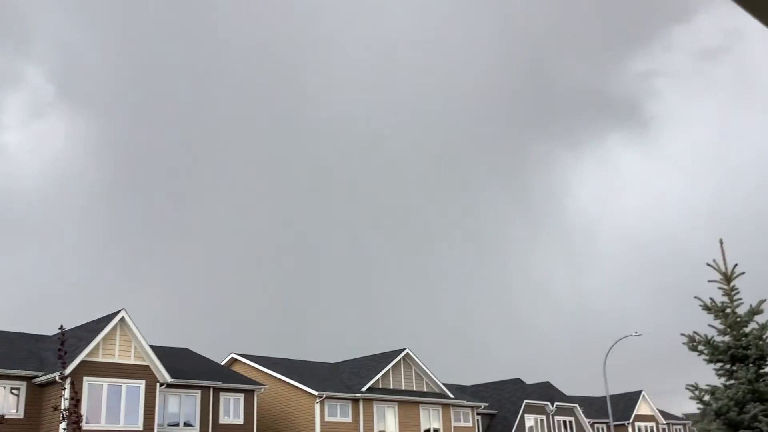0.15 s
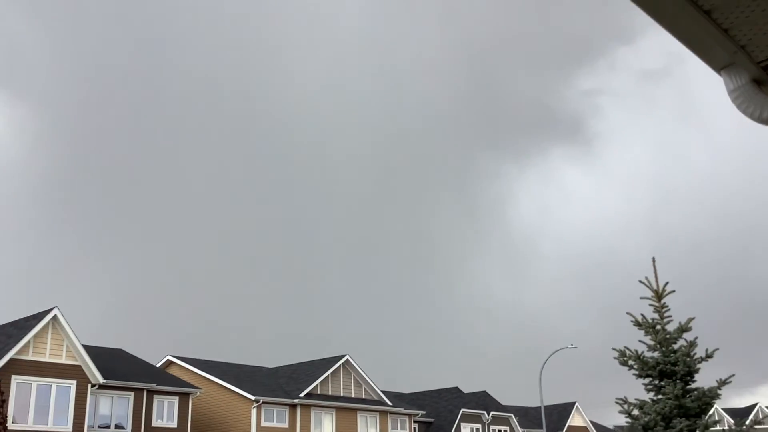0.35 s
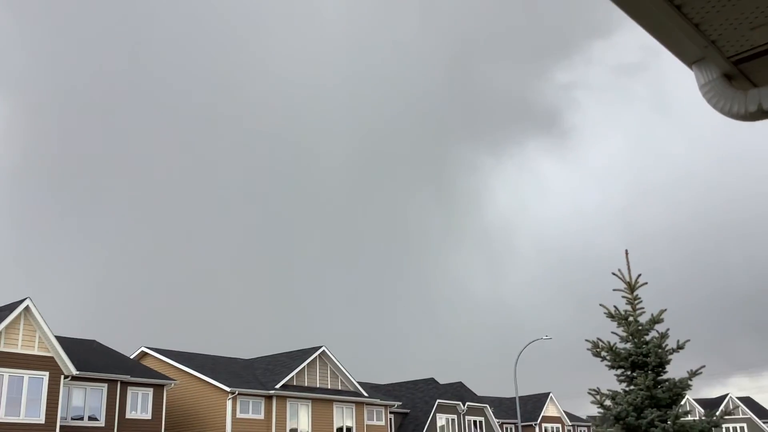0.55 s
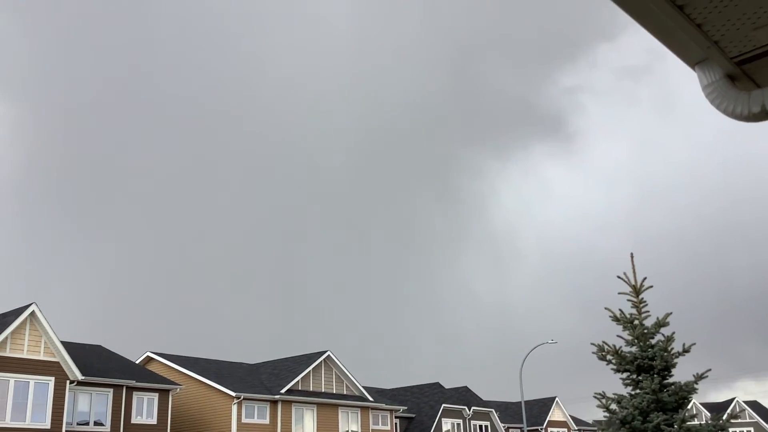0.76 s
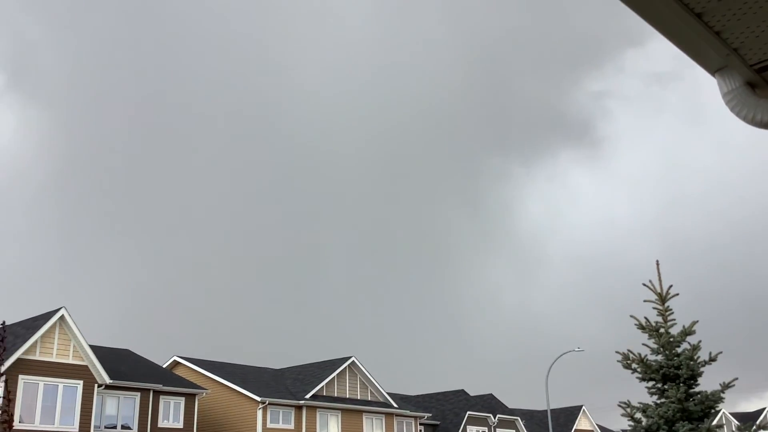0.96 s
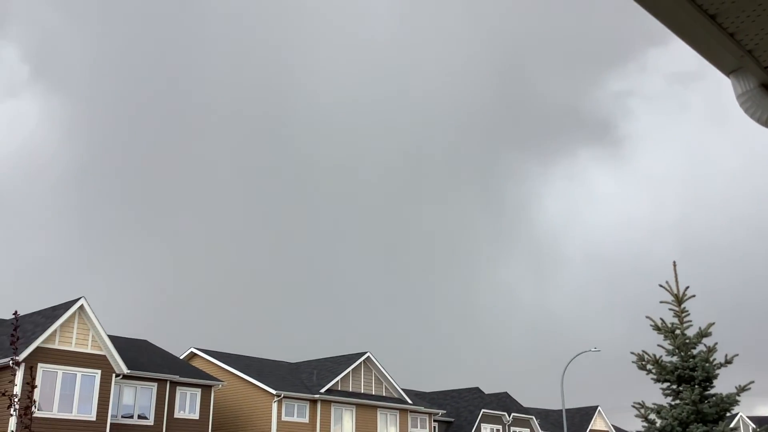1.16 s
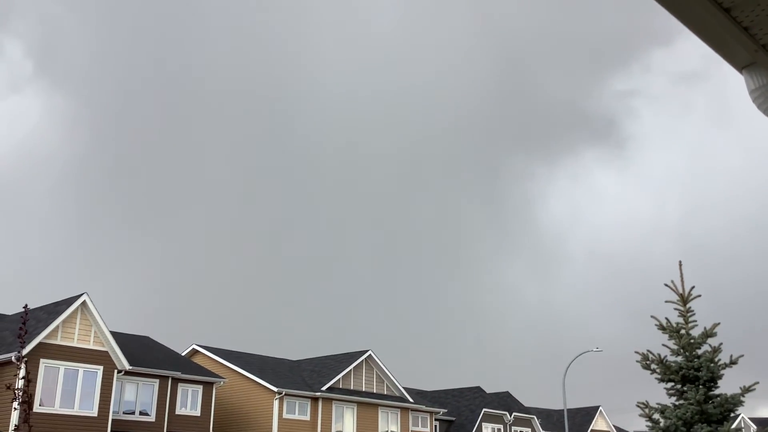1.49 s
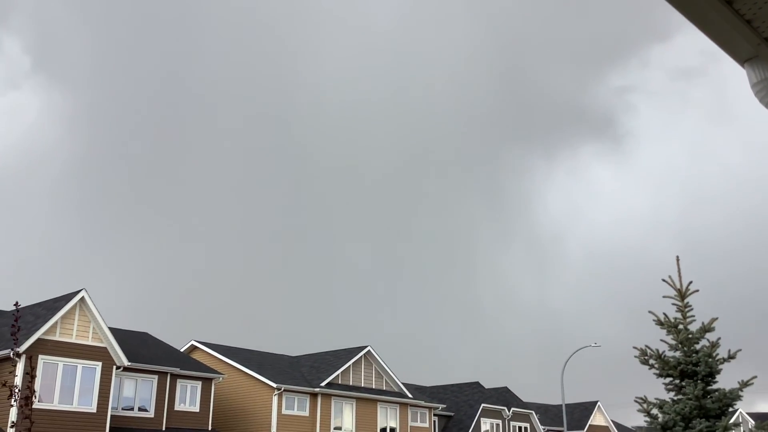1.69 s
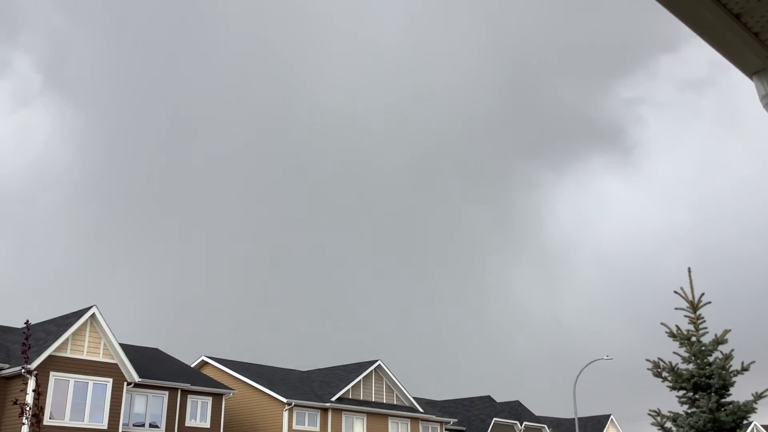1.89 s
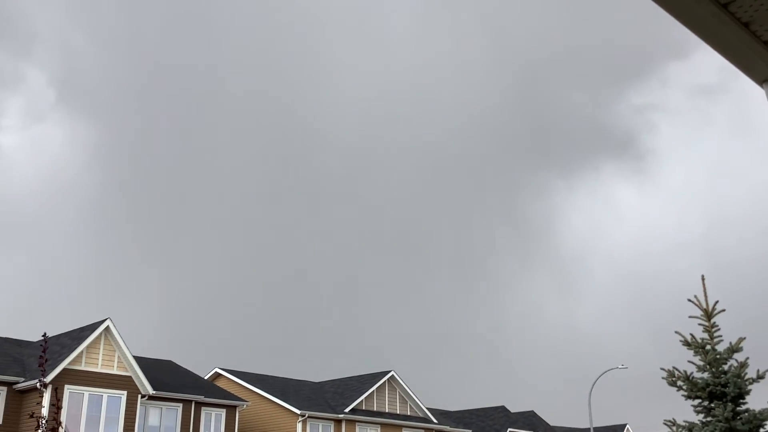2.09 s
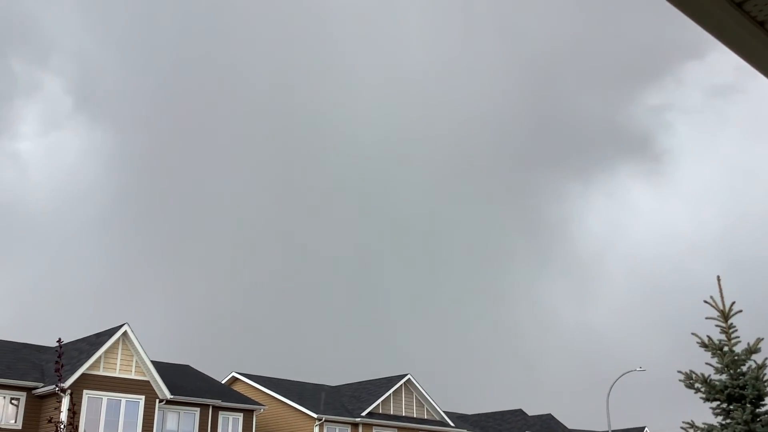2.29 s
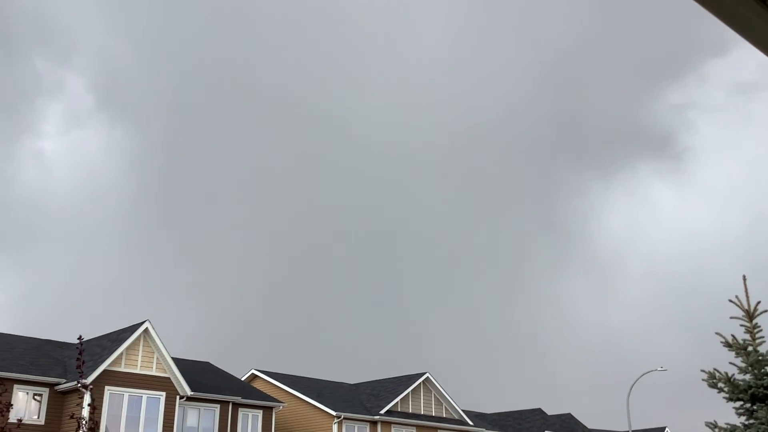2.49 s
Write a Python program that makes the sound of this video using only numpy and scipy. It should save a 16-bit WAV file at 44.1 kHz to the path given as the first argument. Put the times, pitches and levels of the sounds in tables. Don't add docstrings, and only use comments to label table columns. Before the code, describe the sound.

Thunder: a short low grumble over light hissing rain, then at about 0.2 seconds a violent tearing crack with dense, deep booms, squashed at the microphone until about 0.6. It sinks to a rumble, then surges again near 1.0, 1.4 to 1.5 and 1.9 to 2.1 seconds, each duller, with weaker rolls until about 2.6. Small raindrops tick and splash close by outdoors.

```python
import sys
import numpy as np
from scipy import signal
from scipy.io import wavfile
from scipy.ndimage import uniform_filter1d

SR = 44100
rng = np.random.default_rng(int(sys.argv[2]) if len(sys.argv) > 2 else 0)


def dump_mix(stems):
    frames = np.atleast_2d(stems).T
    limited = np.clip(frames, -1, 1)
    pcm = np.round(limited * 32767).astype(np.int16)
    wavfile.write(sys.argv[1], SR, pcm)


def gain_from_decibels(decibels):
    exponent = np.asarray(decibels, float) / 20
    return 10 ** exponent


N = 116865


def evened(x):
    return x / np.sqrt(np.mean(x ** 2) + 1e-20)


def add(mix, s, sound):
    part = mix[round(s * SR):][:len(sound)]
    part += sound[:len(part)]


def colour(x, tone):
    f, level_db = np.transpose(tone)
    hz = abs(np.fft.fftfreq(8192, 1 / SR))
    spectrum_db = np.interp(np.log(hz + 1), np.log(f + 1), level_db)
    log_gain = np.maximum(spectrum_db, -100) * np.log(10) / 20
    taps = np.fft.ifft(np.exp(np.conj(signal.hilbert(log_gain)))).real[:4096]
    return evened(signal.oaconvolve(x, taps)[:len(x)])


def swarm(per_s, spread_db):
    hit, size, sign = rng.random((N, 3)).T
    height = gain_from_decibels(-spread_db * np.log(size + 0.0012))
    return (hit < per_s / SR) * height * np.sign(sign - 0.5)


def band(x, lo_hz, hi_hz):
    sos = signal.butter(2, [lo_hz, hi_hz], "band", fs=SR, output="sos")
    return evened(signal.sosfilt(sos, x))


def patched(x, patch_db):
    z = signal.stft(x, SR, nperseg=1024, noverlap=768)[2]
    field = uniform_filter1d(rng.standard_normal(z.shape), size=10, axis=0)
    field = evened(uniform_filter1d(field, size=8, axis=1))
    y = signal.istft(z * gain_from_decibels(patch_db * field), SR, nperseg=1024, noverlap=768)[1]
    return evened(y[:N])


# (f/Hz, level/dB per Hz)
RAIN_TONE = [(2000, -20), (3600, -9.5), (5700, 0.5), (7500, -10.5), (9800, -3.5), (11700, -14),
             (14600, -10), (15900, -30.5)]
PATTER_HZ = [4730, 5600, 7400, 9800, 12000, 14300]
RAIN_DB, RAIN_PATCH_DB = -60.5, 5.5
PATTER_PER_S, PATTER_DB, PATTER_SPREAD_DB, PATTER_T60 = 1300, -66, 3, 0.12


def rain():
    hiss = patched(colour(rng.standard_normal(N), RAIN_TONE), RAIN_PATCH_DB)
    t, patter = np.arange(2000) / SR, np.zeros(N)
    for hz in PATTER_HZ:
        tick = rng.standard_normal(2000) * gain_from_decibels(-60 * t / PATTER_T60)
        hits = swarm(PATTER_PER_S / len(PATTER_HZ), PATTER_SPREAD_DB)
        ticks = signal.oaconvolve(hits, tick)[:N]
        patter += band(ticks, hz * 0.81, hz * 1.2) * (PATTER_HZ[0] / hz) ** 0.75
    return gain_from_decibels(RAIN_DB) * hiss + gain_from_decibels(PATTER_DB) * evened(patter)


# (t/s, peak level/dB, low part above high part/dB, t60/s)
DROPS = [(0.02, -44, 0, 0.044), (0.105, -40, 1, 0.085), (0.2114, -48, 3.5, 2.1), (0.2813, -37.5, -9, 0.081),
         (.327, -50, -11, .1), (0.3481, -47, 8, 0.04), (.474, -53, 4, .05), (.507, -48, 2, .06),
         (.527, -42, 1, .12), (0.381, -35.5, -3, 0.072), (0.4105, -44, -11, 0.39), (0.554, -49.5, -3, 0.06),
         (0.5801, -51, -10, 0.085), (0.7763, -51, 0, 0.13), (1.0201, -46, -2, 0.033),
         (1.067, -56, -3, 0.055), (1.2947, -37.5, -5.5, 0.14), (1.6174, -50, 3.5, 0.62),
         (1.6984, -46.5, 2, 0.17), (1.933, -41.5, -2, 0.23), (1.9595, -52, 9, 0.067),
         (2.1754, -42.5, -0.5, 0.3), (2.2358, -53, -8, 0.036), (2.4146, -43, 1, 0.059)]
DROP_TRIM_DB, SPLASH_DB = -4, -1.5
DROP_RISE_S, DROP_T60_MAX = 0.006, 0.13


def drops():
    noise, t, out = rng.standard_normal(N + SR), np.arange(SR // 8) / SR, np.zeros(N)
    high = band(band(noise, 7000, 15500), 7000, 15500)
    low = band(noise, 3800, 7500)
    for s, db, low_db, t60 in DROPS:
        start = round(s * SR)
        at = slice(start, start + len(t))
        decay = gain_from_decibels(SPLASH_DB - 60 * t / min(t60, DROP_T60_MAX))
        shape = gain_from_decibels(db + DROP_TRIM_DB) * np.minimum(t / DROP_RISE_S, 1) * decay
        add(out, s, shape * (high[at] + gain_from_decibels(low_db) * low[at]))
    return out


# (t/s, level/dB, deep part above it/dB)
ROLL = [(0, -33, -7), (.07, -52, 5), (0.224, -39.5, 0), (0.234, -17, 1.5), (.45, -14, 11), (.62, -20, 1.5),
        (.76, -27, 4.5), (.99, -26, 1.5), (1.05, -24, 0), (1.29, -32.5, 2.5), (1.329, -26, -2.5),
        (1.55, -28, 4), (1.9, -33, 8), (1.95, -28, 8), (2.4, -29.5, 0.5), (2.47, -35, 8), (2.56, -31, -0.5),
        (2.65, -26, -7)]
# (f/Hz, level/dB per Hz)
ROLL_TONE = [(250, -21), (480, 0.5), (800, -0.5), (1500, -5), (2200, -12.5), (3400, -34), (6000, -54.5),
             (12000, -89)]
# (f/Hz, level/dB per Hz)
DEEP_TONE = [(25, -12.5), (60, -9.5), (100, 1.5), (180, -2.5), (320, -3), (500, -10), (900, -20),
             (3000, -94.5)]
ROLL_SPREAD_DB, ROLL_PATCH_DB = 2, 1.5
DEEP_STEADY = 0.25


def roll():
    s, db, deep_db = np.transpose(ROLL)
    t = np.arange(N) / SR
    upper = patched(colour(swarm(8000, ROLL_SPREAD_DB), ROLL_TONE), ROLL_PATCH_DB)
    deep = patched(colour(swarm(3000, ROLL_SPREAD_DB), DEEP_TONE), patch_db=2.0)
    power = uniform_filter1d(deep ** 2, size=1500)
    deep = evened(deep / (power + 0.05) ** (DEEP_STEADY / 2))
    return gain_from_decibels(np.interp(t, s, db)) * (upper + gain_from_decibels(np.interp(t, s, deep_db)) * deep)


# (t/s, peak level/dB, t60/s)
SIZZLE = [(0.0654, -36, 0.63), (0.225, -20.5, 0.24), (0.2898, -23.5, 0.33), (0.3294, -38, 0.49),
          (0.3481, -39, 0.15), (0.373, -18, 0.35), (0.4094, -28.5, 0.3), (0.4394, -20, 0.27),
          (0.4973, -26, 0.22), (0.5294, -40.5, 0.33), (0.58, -39, 0.41), (.66, -46.5, 0.92),
          (1.0036, -19.5, 0.13), (1.025, -45, 0.074), (1.08, -49, 0.4), (1.3965, -41, 0.23),
          (1.436, -41.5, 0.2), (2.0428, -45, 0.15), (2.366, -39.5, 0.23), (2.593, -41, 0.082)]
# (f/Hz, level/dB per Hz)
SIZZLE_TONE = [(2500, 4.5), (3500, 3.5), (5500, 0), (7000, -11), (10000, -19.5), (12000, -35)]
SIZZLE_TRIM_DB, SIZZLE_RISE_S = -8, 0.0039


def sizzle():
    t, shape = np.arange(SR // 3) / SR, np.zeros(N)
    for s, db, t60 in SIZZLE:
        rise = np.minimum(t / SIZZLE_RISE_S, 1)
        add(shape, s, rise * gain_from_decibels(db + SIZZLE_TRIM_DB - 60 * t / t60))
    return shape * patched(colour(swarm(14000, 2.0), SIZZLE_TONE), patch_db=1.2)


BOOM_WIDTH, BOOM_TRIM_DB = 0.28, -5
LEAD_IN = 2000


def boom(shocks, s, db, hz, t60, rise_s):
    piece = np.roll(shocks, LEAD_IN - round(s * SR))[:SR // 4 + LEAD_IN]
    lo_hz, hi_hz = hz / (1 + BOOM_WIDTH), hz * (1 + BOOM_WIDTH)
    low = band(band(piece, lo_hz, hi_hz), lo_hz / 2, hi_hz * 2)
    power = uniform_filter1d(low ** 2, size=round(2 * SR / hz))
    low = (low / np.sqrt(power + 0.025))[LEAD_IN:]
    t = np.arange(len(low)) / SR
    opening = np.sin(np.pi / 2 * np.minimum(t / (rise_s + 0.5 / hz), 1)) ** 2
    return low * opening * gain_from_decibels(db + BOOM_TRIM_DB - 60 * t / t60)


# (t/s, boom peak level/dB, boom pitch f/Hz, crackle above boom/dB)
CLAPS = [(.005, -26.5, 167, 4), (0.098, -23.5, 157, 1.5), (0.149, -24.5, 256, 0.5), (.159, -29, 400, 3),
         (0.171, -26.5, 568, 8.5), (0.228, 8.5, 285, -4.5), (0.251, -26, 290, -10), (0.275, -0.5, 350, -11),
         (0.29, 1.5, 252, -8), (0.307, 4, 430, -29), (0.336, 4.5, 126, -11), (0.344, 5, 92, -21.5),
         (0.38, 3, 299, -4.5), (0.41, -3.5, 403, -5.5), (.425, 5.5, 225, -12), (.448, -1, 242, -10.5),
         (0.471, 3, 254, -8.5), (0.497, 9, 191, -15.5), (0.552, 0, 306, -13.5), (0.58, 0, 194, -17.5),
         (0.595, 0, 294, -17), (1.002, -4.5, 132, -8.5), (0.05, -32.5, 500, -2.5), (0.629, -10.5, 110, -10),
         (0.719, -24, 180, 2.5), (1.316, -35, 500, -4), (1.4, -12.5, 490, -5.5), (1.473, -18.5, 500, 1),
         (1.638, -22.5, 470, -8.5), (1.737, -27, 600, -4), (1.936, -28, 300, -7.5),
         (2.078, -15, 466, -17.5), (2.187, -35.5, 700, -25), (2.348, -18, 400, -8.5),
         (2.542, -20, 700, -18.5)]
# (t/s, peak level/dB)
SNAPS = [(0.047, -39), (0.1, -40.5), (0.238, -15.5), (0.294, -21.5), (0.348, -3.5), (0.388, -18),
         (0.415, -7), (.452, -18.5), (0.502, -27), (0.555, -22.5), (1.005, -29.5), (1.015, -13.5),
         (1.734, -32.5), (1.935, -24.5), (2.184, -27.5)]
# (t/s, peak level/dB, pitch f/Hz, t60/s)
BOOMS = [(0.022, -7, 145, 0.05), (0.046, -13.5, 327, 0.063), (0.072, -10.5, 270, 0.067),
         (0.199, -8, 210, 0.041), (0.248, 3.5, 80, 0.21), (0.303, -11, 487, 0.097), (0.556, -2, 106, 0.5),
         (0.678, -7, 320, 0.092), (0.698, -15, 101, 0.23), (0.784, -13, 110, 0.24), (0.838, -11, 105, 0.14),
         (0.926, -11, 96, 0.14), (1.04, -23, 139, 0.049), (1.195, -17, 125, 0.25), (2.13, -25, 303, 0.2),
         (2.168, -17, 208, 0.17), (0.943, -2.5, 300, 0.054), (1.001, 4, 350, 0.13), (1.006, -13, 577, 0.14),
         (1.001, 2.5, 115, 0.15), (0.23, -15, 710, 0.13), (.59, -15, 109, 0.21), (1.35, -15.5, 298, .25),
         (1.461, -9, 476, 0.17), (2.052, -14.5, 473, 0.26), (1.941, -8, 235, 0.11), (1.419, -9, 276, .2),
         (1.074, -5, 126, 0.1), (1.322, -15.5, 350, 1), (1.398, -0.5, 355, 0.17), (1.397, 3, 160, 0.14),
         (1.446, -5.5, 140, 0.13), (1.465, 3, 256, 0.13), (1.501, -5.5, 325, 0.16),
         (1.551, -3.5, 230, 0.22), (1.482, 0.5, 124, 0.11), (1.735, -30, 240, 0.13),
         (1.932, 2, 118.6, 0.18), (1.991, -15.5, 313, 0.3), (2.014, -0.5, 223, 0.15), (2.09, -6, 121, 0.23),
         (2.097, -6, 370, 0.14), (2.349, -12, 140, 0.27), (2.563, -14, 233, 0.33)]
# (f/Hz, level/dB per Hz)
CRACKLE_TONE = [(300, -19.5), (600, -3.5), (1500, -6.5), (2400, -11.5), (3300, -27), (4500, -46),
                (9000, -77)]
SHOCKS_PER_S, SHOCK_SPREAD_DB = 1500, 4
RISE_S, BOOM_T60, CRACKLE_T60, CRACKLE_TRIM_DB = 0.0034, 0.19, 0.21, -9
FRONT_T60, FRONT_GAIN = 0.005, 0.56
SNAP_T60 = 0.044
FAR_RISE_S, FAR_TRIM_DB = 0.0023, -2


def claps():
    near = swarm(SHOCKS_PER_S, SHOCK_SPREAD_DB)
    far = swarm(SHOCKS_PER_S, SHOCK_SPREAD_DB)
    out, strength = np.zeros(N), np.zeros(N)
    t = np.arange(SR // 4) / SR
    rise = np.minimum(t / RISE_S + FRONT_GAIN, 1)
    front = 1 + FRONT_GAIN * gain_from_decibels(-60 * t / FRONT_T60)
    stroke = rise * front * gain_from_decibels(-60 * t / CRACKLE_T60)
    for s, db, hz, crackle_db in CLAPS:
        add(strength, s, stroke * gain_from_decibels(db + crackle_db + CRACKLE_TRIM_DB))
        add(out, s, boom(near, s, db, hz, BOOM_T60, RISE_S))
    for s, db in SNAPS:
        add(strength, s, gain_from_decibels(db - 60 * t / SNAP_T60))
    for s, db, hz, t60 in BOOMS:
        add(out, s, gain_from_decibels(FAR_TRIM_DB) * boom(far, s, db, hz, t60, FAR_RISE_S))
    crackle = colour(strength * swarm(8000, 2.6), CRACKLE_TONE)
    return out + np.sqrt(np.mean(strength ** 2)) * crackle


def scene():
    return (rain() + drops() + roll() + sizzle() + claps())[None]


def roll_off(x):
    return signal.sosfilt(signal.butter(12, 15710, fs=SR, output="sos"), x)


MIC_LOW_HZ = 62
KNEE_DB, SQUEEZE, RECOVER_DB_S = -10.5, 0.64, 160
CEILING = 1.08


def record(dry):
    dry = signal.sosfilt(signal.butter(3, MIC_LOW_HZ, "high", fs=SR, output="sos"), dry)
    power_db = 10 * np.log10(abs(uniform_filter1d(dry[0] ** 2, size=200)) + 1e-12)
    fall = np.arange(N) * RECOVER_DB_S / SR
    held_db = np.maximum.accumulate(power_db + fall) - fall
    over_db = np.maximum(held_db - KNEE_DB, 0)
    ducked = dry / gain_from_decibels(SQUEEZE * uniform_filter1d(over_db, size=100))
    soft = ducked / (1 + abs(ducked / CEILING) ** 6) ** (1 / 6)
    return roll_off(soft)


dry = scene()
out = record(dry)
dump_mix(out)
```